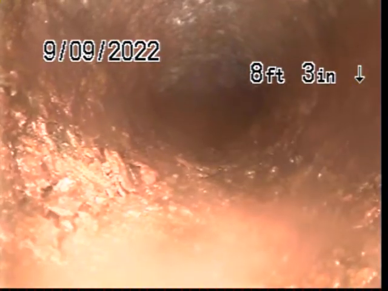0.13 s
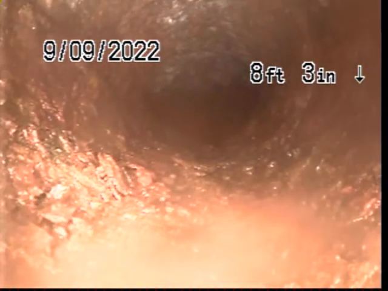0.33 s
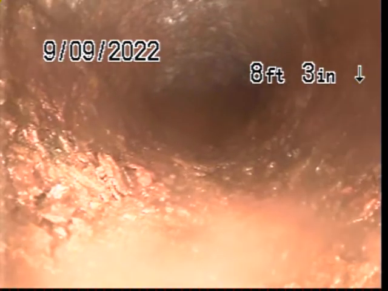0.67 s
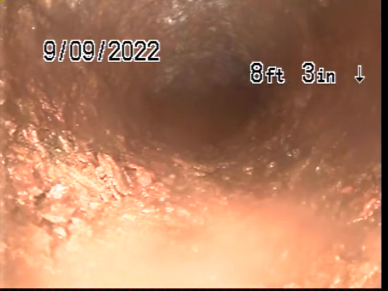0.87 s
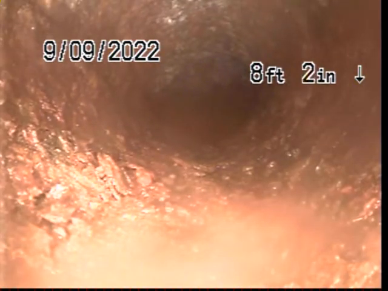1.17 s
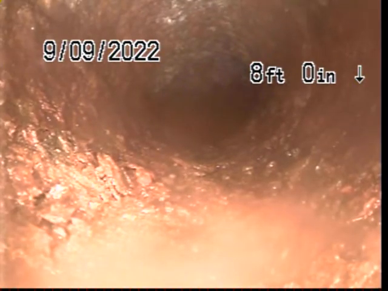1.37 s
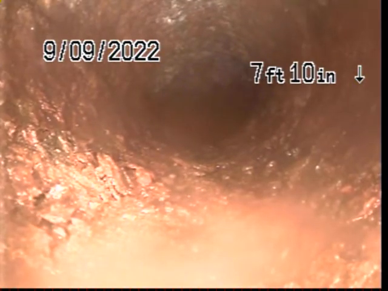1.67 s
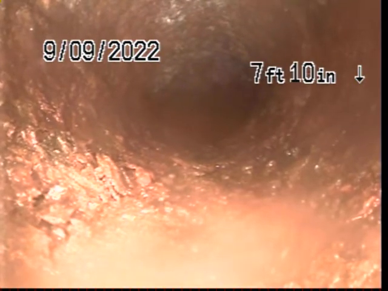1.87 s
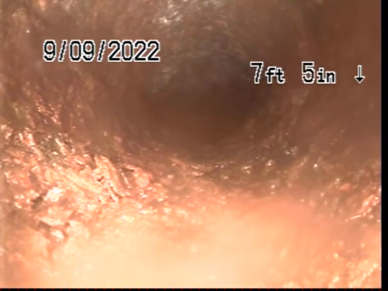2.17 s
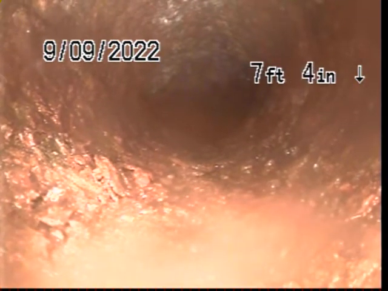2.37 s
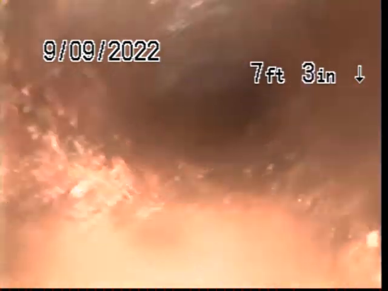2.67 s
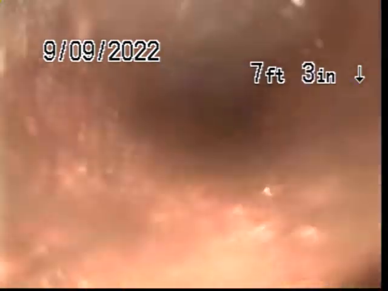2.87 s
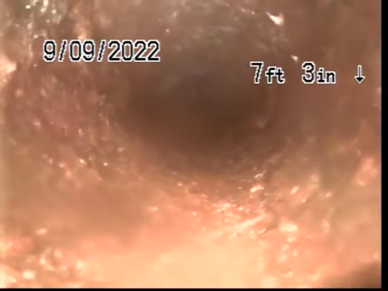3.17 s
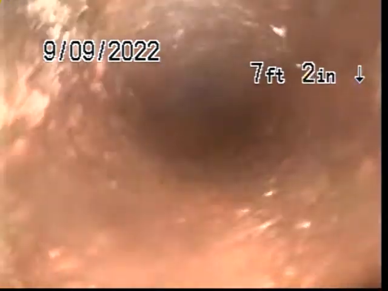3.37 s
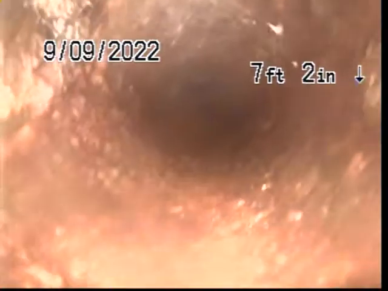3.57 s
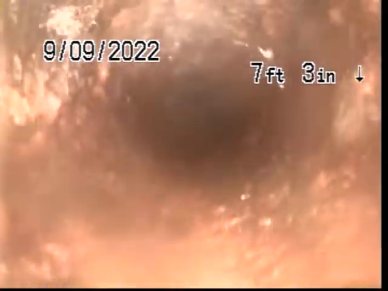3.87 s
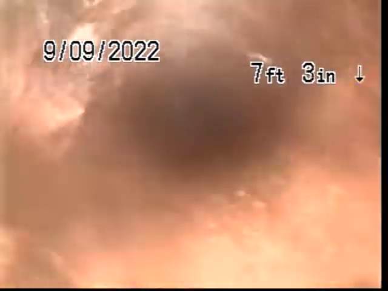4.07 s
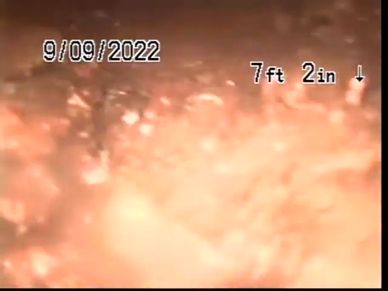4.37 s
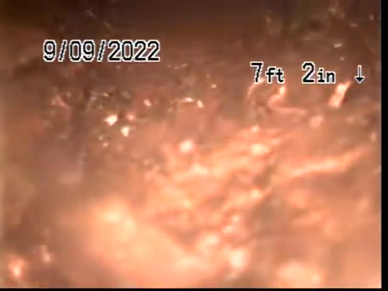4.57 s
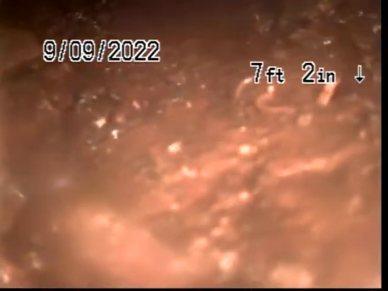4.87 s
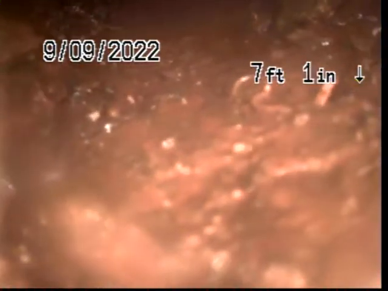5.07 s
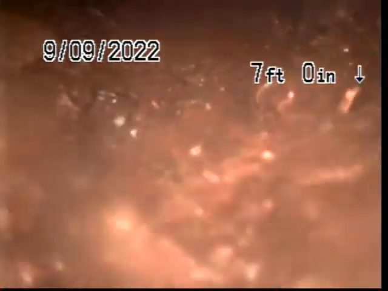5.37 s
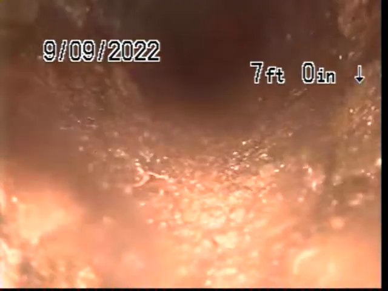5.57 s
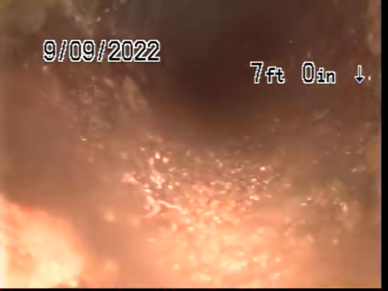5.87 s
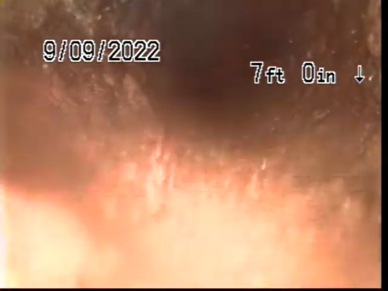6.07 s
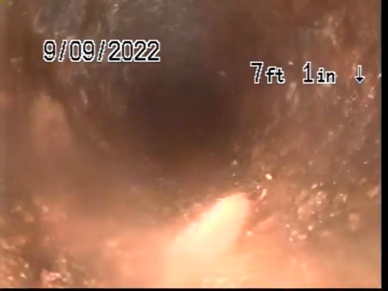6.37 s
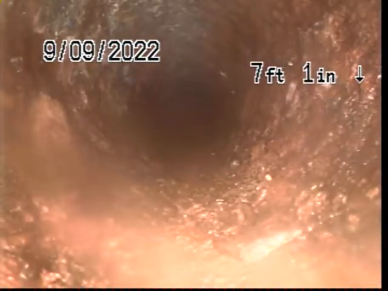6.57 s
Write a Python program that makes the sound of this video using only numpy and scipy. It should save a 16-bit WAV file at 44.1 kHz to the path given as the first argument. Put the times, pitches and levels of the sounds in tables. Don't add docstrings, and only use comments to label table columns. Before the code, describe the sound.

In a small hard room, an inspection console hums steadily with fan hiss, a thin very high whistle, fine electrical buzz and soft ticks five times a second. A stiff cable gives faint gritty scrapes at first, then rests. Later come jerky scrapes and knocks on the pipe rim, a hollow clack around four seconds, and finally a loud, bright clattering snap, heard close to the microphone.

```python
import sys
import numpy as np
from scipy import signal
from scipy.fft import rfft, irfft, next_fast_len
from scipy.io import wavfile
from scipy.ndimage import map_coordinates

SR = 44100
rng = np.random.default_rng(int(sys.argv[2]) if len(sys.argv) > 2 else 0)


def log_audio(samples):
    frames = np.atleast_2d(samples).T
    limited = np.clip(frames, -1, 1)
    pcm = np.round(limited * 32767).astype(np.int16)
    wavfile.write(sys.argv[1], SR, pcm)


def natural_amplitude(level_db):
    exponent = np.asarray(level_db, float) / 20
    return 10 ** exponent


N = 296352
RING = SR // 5


def line(table, column=1):
    rows = np.array(table)
    return np.interp(np.arange(N) / SR, rows[:, 0], rows[:, column])


def unit(x):
    return x / np.sqrt(np.mean(x ** 2))


def band(x, hz, width):
    return signal.lfilter(*signal.iirpeak(hz, hz / width, fs=SR), x)


def peaks(x, table):
    out = 0
    for hz, width, db in table:
        out = out + natural_amplitude(db) / np.sqrt(width) * band(band(x, hz, width), hz, width)
    return unit(out)


def fade(t60):
    return np.exp(-np.log(1000) * np.arange(RING) / SR / t60)


def ring(hz, t60):
    return np.sin(2 * np.pi * hz * np.arange(RING) / SR) * fade(t60)


def walk(rate):
    steps = rng.standard_normal(int(N / SR * rate) + 4)
    places = np.arange(0, N, 64) * rate / SR + 1
    return 0.67 * map_coordinates(steps, [places], order=3).repeat(64)[:N]


def turns(hz):
    return 2 * np.pi * np.cumsum(hz) / SR


def grains(rate, spread_db, smear_s):
    clicks = (rng.random(N) < rate / SR) * natural_amplitude(spread_db * rng.exponential(size=N))
    return signal.lfilter([1], [1, -np.exp(-1 / (smear_s * SR))], clicks) * rng.standard_normal(N)


# (frequency [Hz], width [Hz], level [dB])
WALL_BODY = [(2730, 2460, -1), (1355, 2560, -6)]
# (frequency [Hz], width [Hz], level [dB])
GLOVE = [(9900, 6300, -1.2), (13900, 3200, -1.8)]
# (start [s], held [s], grit level [dB])
SLIDE_STROKES = [(.225, 0.063, -31.5), (.32, .055, -35.5), (.395, 0.02, -41), (.455, 0.051, -37),
                 (2.09, 0.01, -38), (3.61, .07, -41), (5.84, .02, -40.5), (6.22, 0.022, -35.5)]
WIPE_STROKES = [(2.303, 0.13, -35)]
JERK_STROKES = [(2.624, .05, -40), (2.683, 0.021, -31), (2.88, 0.055, -35.5), (3.926, 0.01, -35)]
GRIND_STROKES = [(4.128, 0.055, -22.5), (4.25, 0.068, -34.5)]
SNAP_STROKES = [(6.279, 0.049, -20.5)]
# (rim [Hz], rim width [Hz], pipe wall [dB], sheath fizz [dB], glove rustle [dB]), re grit
SLIDE, WIPE = (4694, 2400, -23, -15, -17), (5898, 1700, -15, -8.5, -9)
JERK, GRIND = (4900, 1300, -3.5, -13, -26), (4700, 2400, -4.5, -7, -17.5)
SNAP = (5348, 1150, -17, -17.5, -25)
# (attack [s], sag while held [dB/s], release once let go [dB/s])
SLIDE_GRIP, WIPE_GRIP, JERK_GRIP = (0.033, 49, 320), (0.011, 12, 220), (0.0086, 27, 146)
GRIND_GRIP, SNAP_GRIP = (0.017, 53, 157), (0.0018, 60, 168)
# (frequency [Hz], width [Hz])
SLIDE_FIZZ, WIPE_FIZZ, JERK_FIZZ = (8300, 6500), (7600, 3900), (7300, 2100)
GRIND_FIZZ, SNAP_FIZZ = (7300, 1100), (9900, 4900)
ATTACK_FROM_DB, TREBLE_FADE = 12, 1.43


def dragging():
    grit = grains(2500, 1.8, 0.003) * natural_amplitude(0.7 * walk(45))
    out, t = np.zeros(N), np.arange(N) / SR
    kinds = [(SLIDE_STROKES, SLIDE, SLIDE_GRIP, SLIDE_FIZZ),
             (WIPE_STROKES, WIPE, WIPE_GRIP, WIPE_FIZZ),
             (JERK_STROKES, JERK, JERK_GRIP, JERK_FIZZ),
             (GRIND_STROKES, GRIND, GRIND_GRIP, GRIND_FIZZ),
             (SNAP_STROKES, SNAP, SNAP_GRIP, SNAP_FIZZ)]
    wall = peaks(np.roll(grit, 150), WALL_BODY)
    rustle = peaks(np.roll(grit, 450), GLOVE)
    for strokes, contact, (attack, sag, release), (fizz_hz, fizz_width) in kinds:
        rim_hz, rim_width, wall_db, fizz_db, rustle_db = contact
        fizz = peaks(np.roll(grit, 300), [(fizz_hz, fizz_width, 0)])
        low = peaks(grit, [(rim_hz, rim_width, 0)]) + natural_amplitude(wall_db) * wall
        high = natural_amplitude(fizz_db) * fizz + natural_amplitude(rustle_db) * rustle
        for s, held, db in strokes:
            at = slice(int(s * SR), int(s * SR) + SR // 2)
            age = t[at] - s - attack
            rise_db = db + ATTACK_FROM_DB * np.minimum(age / attack, 0)
            fall_db = -sag * np.clip(age, 0, held) - release * np.maximum(age - held, 0)
            out[at] += natural_amplitude(rise_db + fall_db) * low[at]
            out[at] += natural_amplitude(rise_db + TREBLE_FADE * fall_db) * high[at]
    return out


# (time [s], peak level [dB], ring [Hz], wall share [dB], contact time [s])
RIM_KNOCKS = [(2.627, -24, 2550, 0.5, 0.0044), (2.685, -11, 4800, -10.5, .001),
              (2.698, -15, 4730, -28, .001), (2.712, -11, 4430, -11.5, .001), (2.878, -19, 1410, -5, .0003),
              (3.93, -32, 4900, -32, 0.0012), (4.131, -12.5, 4300, -9.5, 0.0016),
              (6.28, -20, 4800, -27, 0.00089), (6.284, -3, 5170, -43, 0.0011), (6.293, -1, 5250, -50, .001),
              (6.303, -4, 5080, -32, .001), (6.311, -6, 5400, -40, .001), (6.28, -19, 3900, -30, .001),
              (6.294, -19, 3900, -30, .001)]
# (ratio to WALL_HZ [-], level [dB], t60 [s])
WALL_MODES = [(1, -4, 0.037), (1.25, -28, .03), (1.65, -10.5, 0.075), (2.1, -14.5, 0.067),
              (2.85, -2.5, 0.041), (3.3, 4, 0.013)]
WALL_HZ, CRACK_T60_S, RATTLE_T60_S = 900, 0.025, 0.031


def knocks():
    out = np.zeros(N + SR)
    for s, db, hz, wall_db, contact in RIM_KNOCKS:
        swell = 1 - np.exp(-np.arange(RING) / (contact * SR))
        detune = 1 + 0.03 * rng.standard_normal(len(WALL_MODES))
        noise = rng.standard_normal((2, RING))
        crack = band(band(noise[0], hz, 0.15 * hz), hz, 0.3 * hz) * fade(CRACK_T60_S)
        crack = crack / abs(crack).max()
        wall = 0
        for (ratio, mode_db, t60), d in zip(WALL_MODES, detune):
            wall = wall + natural_amplitude(mode_db) * ring(WALL_HZ * ratio * d, t60)
        rattle = natural_amplitude(13.5) * band(band(noise[1], 1430, 2600), 1430, 2600) * fade(RATTLE_T60_S)
        start = int(s * SR)
        out[start:start + RING] += natural_amplitude(db - 6.5) * (crack + natural_amplitude(wall_db + 4) * swell * (wall + rattle))
    return signal.sosfilt(signal.butter(4, 600, "high", fs=SR, output="sos"), out[:N])


# (time [s], peak level [dB], frequency [Hz])
BOOMS = [(1.812, -40.5, 226), (1.84, -44, 182), (1.811, -51.5, 407), (2.641, -43.5, 233),
         (2.715, -42, 189.5), (2.9, -41, 183), (4.15, -51, 182), (4.19, -48.5, 140), (6.293, -36.5, 193.3),
         (6.315, -46, 170), (6.355, -42.5, 293), (2.628, -38, 960), (2.683, -50, 800), (6.28, -44, 630),
         (6.398, -51, 407), (2.711, -43, 830), (2.89, -34, 900), (4.128, -26.5, 915), (4.145, -34, 968),
         (6.279, -38, 886), (6.335, -44, 883)]
THUD_T60_S, THUD_LOSS = 0.24, 0.8


def thuds():
    out = np.zeros(N + SR)
    for s, db, hz in BOOMS:
        t60 = THUD_T60_S * (200 / hz) ** THUD_LOSS
        swell = 1 - np.exp(-np.arange(RING) * hz / (1.5 * SR))
        modes = ring(hz, t60) + 0.38 * ring(1.12 * hz, t60)
        start = int(s * SR)
        out[start:start + RING] += natural_amplitude(db + 4.5) * swell * modes
    return out[:N]


# (time [s], frequency [Hz])
BLADE_RATE = [(0, 209.75), (1.1, 209.52), (5.9, 212.0), (6.72, 212.1)]
# (multiple [-], first level [dB], last level [dB])
BLADE_TONES = [(1, -59, -59), (2, -69, -73), (3, -63, -62), (4, -54, -55), (5, -62, -63), (6, -65, -66),
               (7, -62, -55), (8, -65, -65), (12, -66, -63)]
# (time [s], frequency [Hz])
MOTOR_RATE = [(0, 44.48), (6.72, 44.358)]
# (multiple [-], level [dB], lag [rad])
MOTOR_TONES = [(2, -100, 6), (4, -71.5, 2), (5, -54.5, 0), (6, -65.5, 2.5), (7, -72, -0.5)]
FAN_START, MOTOR_START = -0.65, -0.48


def motors():
    fan = turns(line(BLADE_RATE)) + FAN_START + 0.005 * walk(6.8)
    motor = turns(line(MOTOR_RATE)) + MOTOR_START
    along = np.arange(N) / N
    tones = 0
    for k, first_db, last_db in BLADE_TONES:
        level_db = first_db + (last_db - first_db) * along + 1.6 * walk(4.2)
        tones = tones + natural_amplitude(level_db) * np.cos(k * fan)
    for k, db, lag in MOTOR_TONES:
        tones = tones + natural_amplitude(db) * np.cos(k * motor + lag)
    return np.sqrt(2) * tones


# (frequency [Hz], level [dB per Hz])
AIR_COLOUR = [(25, -16), (60, -19.5), (110, -19), (200, -8.5), (330, -15), (520, -14), (800, -9),
              (1500, -7.5), (2800, -3), (4900, 1), (6000, -5.5), (8300, -19), (11000, -30.5), (15800, -49)]
AIR_DB = -38


def air():
    size = next_fast_len(N)
    octaves = np.log2(np.maximum(np.arange(size // 2 + 1) * SR / size, 1))
    hz, db = np.transpose(AIR_COLOUR)
    noise = rfft(rng.standard_normal(size)) * natural_amplitude(np.interp(octaves, np.log2(hz), db, -60))
    out, swell = 0, walk(0.77)
    for octave in range(4, 16, 2):
        share = np.clip(1 - abs(octaves - octave) / 2, 0, 1)
        out = out + irfft(noise * share, size)[:N] * natural_amplitude(0.3 * swell + 0.8 * walk(14))
    return unit(out) * natural_amplitude(AIR_DB)


# (time [s], level [dB])
BRIGHTNESS = [(0.0, -58), (0.26, -57), (2.21, -57.5), (3.95, -63), (4.25, -56), (5.69, -62), (6.72, -58)]
# (frequency [Hz], level re whistle [dB], phase [rad])
WHISTLE_SIDES = [(15747.17, -4, 0), (15777.5, -20, 0), (15674.45, -7, 2.8), (15614.51, -13, .8),
                 (15434.69, -14, 2.), (15374.75, -15, 4.)]
LINE_HZ, LINES_PER_FRAME = 15734.39, 525
BLANK_S, BLANK_LENGTH_S = 0.016798, 0.0008


def picture_leak():
    size, frame = 2 ** 14, LINES_PER_FRAME / LINE_HZ
    f = np.arange(size // 2 + 1) / frame + 1e-9

    def lag(s):
        return np.exp(-2j * np.pi * f * s)

    fields = lag(BLANK_S) + lag(BLANK_S + frame / 2 + 0.5 / LINE_HZ)
    edges = 1 + lag(BLANK_LENGTH_S) + 0.2 * lag(0.00205)
    edges = edges * np.exp(-((f - 11900) / 3300) ** 2)
    step = -(1 - lag(BLANK_LENGTH_S)) / (1 + 1j * f / 220) / (1 + (f / 3500) ** 2)
    shape = natural_amplitude(-55.5) * unit(irfft(fields * edges)) + natural_amplitude(-63.5) * unit(irfft(fields * step))
    t, whistle_db = np.arange(N) / SR, line(BRIGHTNESS)
    buzz = np.interp(t % frame, np.arange(size) * frame / size, shape)
    buzz = buzz * natural_amplitude(1.9 * walk(3.15) + 0.15 * (whistle_db + 57))
    tones = np.cos(2 * np.pi * LINE_HZ * t)
    for hz, db, start in WHISTLE_SIDES:
        tones = tones + natural_amplitude(db) * np.cos(2 * np.pi * hz * t + start)
    return buzz + np.sqrt(2) * natural_amplitude(whistle_db + 2.5) * tones


TICK_S, TICK_PERIOD_S, TICK_LENGTH_S = 0.0611, 0.201971, 0.0038


def supply_ticks():
    starts = (np.arange(TICK_S, N / SR - TICK_LENGTH_S, TICK_PERIOD_S) * SR).astype(int)
    chance = rng.standard_normal((len(starts), 2))
    edges, pings = np.zeros(N), np.zeros(N)
    edges[starts] = -natural_amplitude(1.2 * chance[:, 0])
    edges[starts + int(TICK_LENGTH_S * SR)] = natural_amplitude(1.2 * chance[:, 0])
    sag = signal.lfilter([1], [1, -np.exp(-1 / (0.0012 * SR))], edges)
    soft = signal.sosfilt(signal.butter(2, 900, fs=SR, output="sos"), sag)
    pings[starts] = natural_amplitude(-55 + 4 * chance[:, 1])
    return natural_amplitude(-41.5) * soft + np.convolve(pings, ring(8150, 0.034))[:N]


def amplifier_hiss():
    return natural_amplitude(-53) * rng.standard_normal(N)


def scene():
    cable = dragging() + knocks() + thuds()
    console = motors() + air()
    electronics = picture_leak() + supply_ticks() + amplifier_hiss()
    return (cable + console + electronics)[None]


def top_cut(x):
    return signal.sosfilt(signal.butter(12, 17030, fs=SR, output="sos"), x)


def record(dry):
    low_pass = signal.ellip(10, 0.3, 80, 15830, fs=SR, output="sos")
    mix = signal.sosfilt(low_pass, dry)
    return top_cut(mix)


dry = scene()
out = record(dry)
log_audio(out)
```